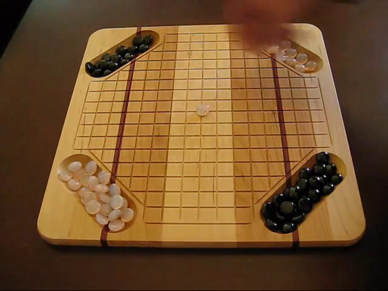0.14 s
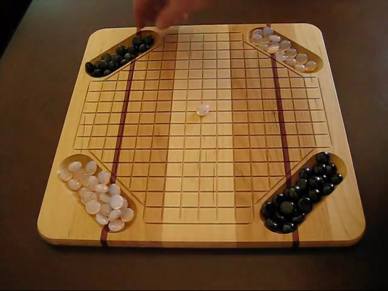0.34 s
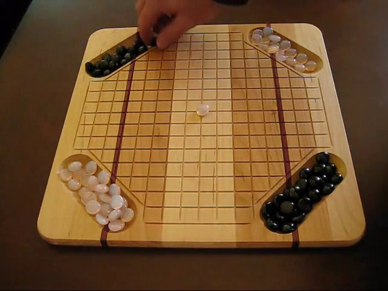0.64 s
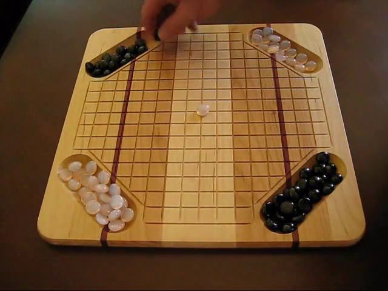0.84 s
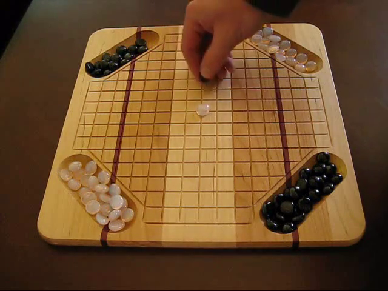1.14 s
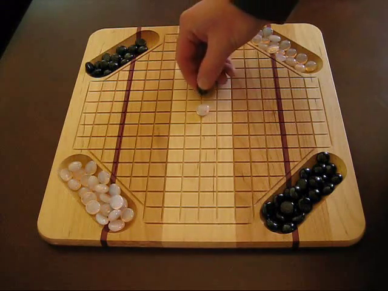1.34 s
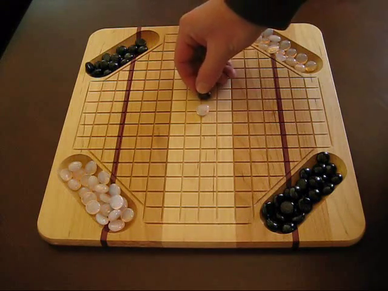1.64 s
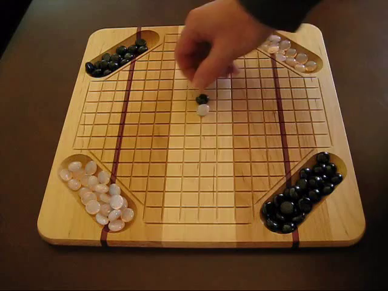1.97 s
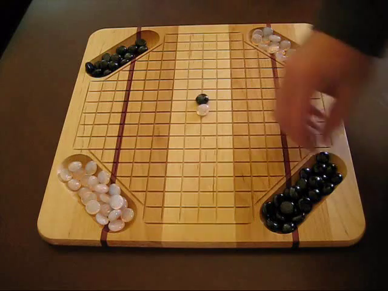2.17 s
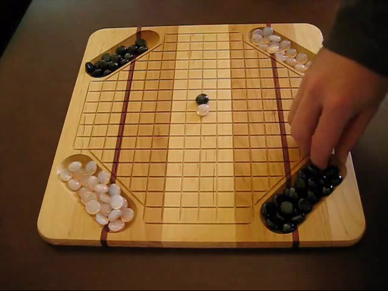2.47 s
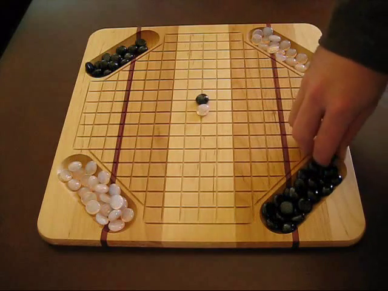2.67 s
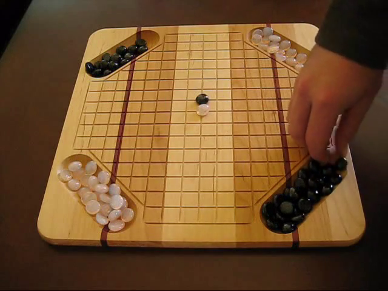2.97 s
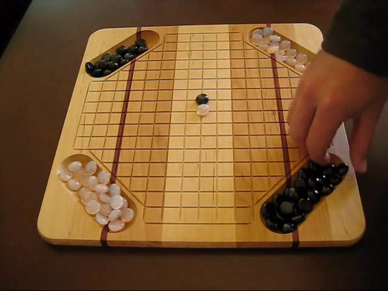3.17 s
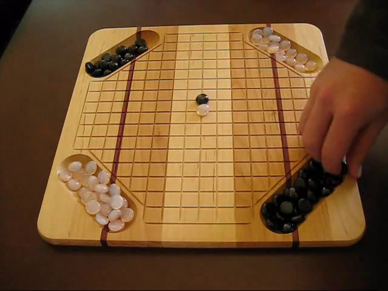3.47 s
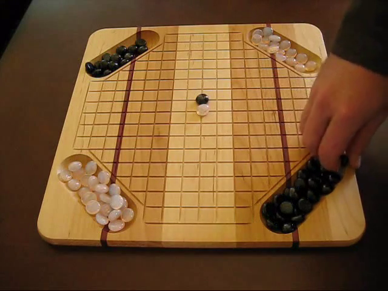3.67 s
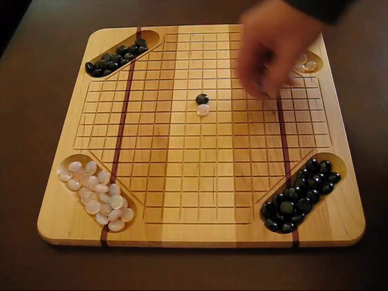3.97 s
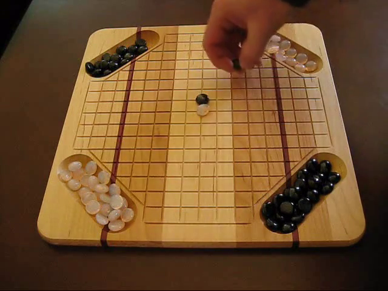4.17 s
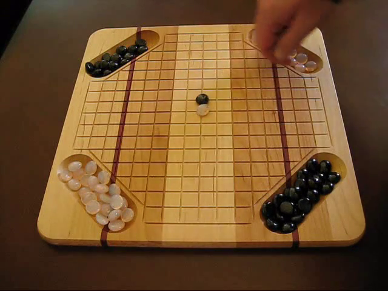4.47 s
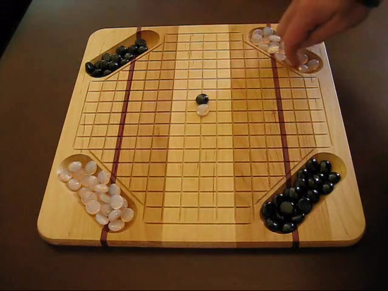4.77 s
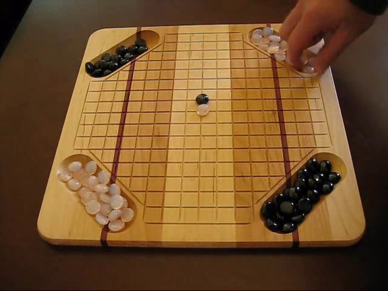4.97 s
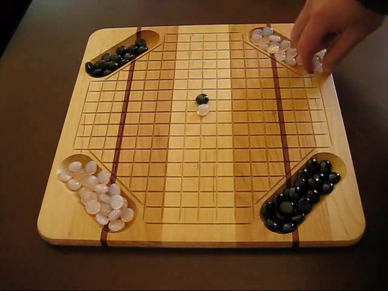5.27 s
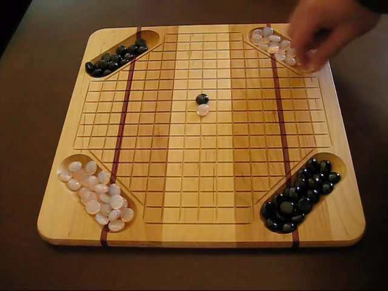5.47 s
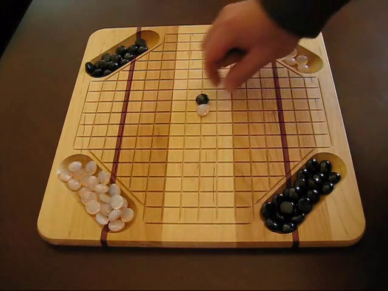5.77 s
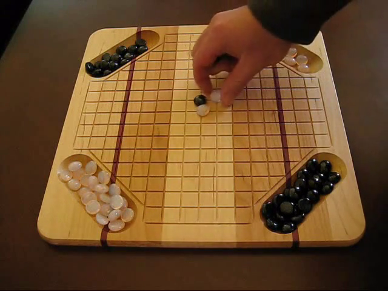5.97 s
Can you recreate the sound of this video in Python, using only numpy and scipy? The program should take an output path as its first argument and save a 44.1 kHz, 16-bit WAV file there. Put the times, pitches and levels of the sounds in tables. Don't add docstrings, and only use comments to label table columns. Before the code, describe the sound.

Glass game pieces are handled on a hollow-cornered wooden board. First come faint touches and a crisp placement with a bounce, then bright glassy clatter in the tray with finger rubs, ending in two hard clicks. Soft picking and a tiny stuttering scrape precede a final flurry of wooden taps. The small microphone picks up short room reflections, hiss and distant motor hum.

```python
import sys
import numpy as np
from scipy import signal
from scipy.fft import rfft, irfft, next_fast_len
from scipy.io import wavfile
from scipy.ndimage import map_coordinates

SR = 44100
rng = np.random.default_rng(int(sys.argv[2]) if len(sys.argv) > 2 else 0)


def ratio_of_db(decibels):
    return 10 ** (np.asarray(decibels, float) / 20)


def wrap_up_sound(samples):
    columns = np.atleast_2d(samples).T
    tamed = np.clip(columns, -1, 1)
    steps = np.round(tamed * 32767).astype(np.int16)
    wavfile.write(sys.argv[1], SR, steps)


N = 269499

TRAY_HZ, TRAY_SPREAD = 3250, .02


def unit(x):
    return x / np.sqrt(np.mean(x ** 2) + 1e-20)


def along(points, hz):
    f, v = np.transpose(points)
    return np.interp(np.log(hz + 1), np.log(f + 1), v)


def curves(points):
    s, *columns = np.transpose(points)
    t = np.arange(N) / SR
    return [np.interp(t, s, c, left=-200, right=-200) for c in columns]


def wobble(rate):
    knots = rng.standard_normal(int(N * rate / SR) + 4)
    return map_coordinates(knots, [np.arange(N) * rate / SR])


def filtered(x, response):
    m = next_fast_len(len(x) + 8192)
    return irfft(rfft(x, m) * response(np.fft.rfftfreq(m, 1 / SR)), m)[:len(x)]


def coloured(spectrum, grain_db=0):
    noise = rng.standard_normal(N) * ratio_of_db(grain_db * wobble(900))
    points = [(11.0, -68.0)] + list(spectrum) + [(22000, -101.5)]
    return unit(filtered(noise, lambda hz: ratio_of_db(along(points, hz))))


def ring(modes, t, spread, scatter_db, chatter=.002):
    hz, t60, db = np.transpose(modes)[:, :, None]
    chance = rng.standard_normal((2, len(modes), 1))
    decay = ratio_of_db(db + scatter_db * chance[0] - 60 * t / t60)
    x = np.sum(decay * np.sin(2 * np.pi * hz * (1 + spread * chance[1]) * t), 0)
    force = rng.standard_normal(len(t)) * (1 - np.exp(-t / 0.0003)) * np.exp(-(t / chatter) ** 2)
    soft = (1 - np.exp(-t / 0.00028)) ** 2
    x = signal.fftconvolve(x * soft, force)[:len(t)]
    return x / np.linalg.norm(x)


def knocks(table, low_modes, upper_modes, crack_colour, crack_t60, level_db, damping=1):
    bright_db = -38
    out, t = np.zeros((2, N + SR)), np.arange(SR // 40) / SR
    hiss_source = coloured(crack_colour)
    for s, db, low_db, upper_db, crack_db, main_hz in table:
        start = round(s * SR)
        main_modes = [(main_hz, .006, 0), (.86 * main_hz, .005, -6), (1.14 * main_hz, .005, -6)]
        wood = 0
        for modes, group_db in [(main_modes, 0), (low_modes, low_db), (upper_modes, upper_db)]:
            damped = np.array(modes) / [1, damping, 1]
            wood = wood + ratio_of_db(group_db) * ring(damped, t, 0.014095, 2, chatter=0.0003)
        crack = hiss_source[min(start, N - len(t)):][:len(t)]
        crack = crack * ratio_of_db(-60 * t / crack_t60) * (1 - np.exp(-t / 0.0005))
        crack = ratio_of_db(db + crack_db + level_db) * crack / np.linalg.norm(crack)
        out[0, start:][:len(t)] += ratio_of_db(db + level_db) * wood
        out[int(db + crack_db > bright_db), start:][:len(t)] += crack
    low_cut = signal.butter(3, 650, "high", fs=SR, output="sos")
    return signal.sosfilt(low_cut, out[:, :N])


def linger(x, modes, level_db):
    def slab(f):
        total = 0
        for hz, t60, db in modes:
            width = np.log(1000) / (np.pi * t60)
            resonance = 1j * f / (hz * hz - f * f + 1j * f * width)
            total = total + ratio_of_db(db) * np.sqrt(1000 * width) * resonance
        return total
    return x + [ratio_of_db(level_db) * filtered(x[0], slab), 0 * x[1]]


def rows(*columns):
    return np.column_stack(np.broadcast_arrays(*columns))


def hum():
    # t/s, f/Hz, level/dB
    lower_tone = [(0.0, 113.1, -76), (0.82, 107.9, -61.5), (1.77, 106.5, -63), (1.89, 112.4, -78.5),
                  (2.11, 103.4, -76), (5.04, 102.5, -62), (6.11, 100.7, -61)]
    upper_tone = [(0.0, 166.2, -59.5), (0.314, 163.8, -59), (0.55, 165.6, -70)]
    total = 0
    for points in (lower_tone, upper_tone):
        hz, db = curves(points)
        level = np.sqrt(2) * ratio_of_db(db + 0.77 * wobble(3.77))
        total = total + level * np.sin(2 * np.pi * np.cumsum(hz) / SR)
    return total


def room_air():
    # t/s, level/dB
    air_level = [(0.0, -49.5), (0.97, -54.5), (5.9, -59.5), (6.11, -44)]
    # f/Hz, level/dB per Hz
    air_colour = [(150, -11), (400, -10.5), (800, -6), (1500, -10), (4000, -17.5)]
    return ratio_of_db(curves(air_level)[0] - 3) * coloured(air_colour)


def microphone_hiss():
    # f/Hz, level/dB per Hz
    hiss_colour = [(12, -57), (20, -18.5), (103, -14), (207, -12.5), (504, -14.5), (563, -14), (612, -16),
                   (15400, -31)]
    return ratio_of_db(-54 + 1.5 + 0.2805 * wobble(3.29)) * coloured(hiss_colour)


def fingers():
    # middle t/s, length/s, wood level/dB, skin and glass level/dB
    rubs = [(0.027, 0.039, -49, -62.5), (0.071, 0.051, -44.5, -47), (0.505, 0.058, -47.5, -61.5),
            (0.65, 0.18, -53, -59.5), (0.709, 0.025, -50, -65.5), (1.2, .08, -58, -61),
            (2.406, 0.072, -43, -51), (2.605, 0.0814, -60, -70), (2.671, 0.045, -49, -66.5),
            (2.775, 0.02823, -45, -50), (2.96, 0.078, -46, -55), (3.051, 0.095, -42.5, -50),
            (3.482, 0.0393, -53, -64), (3.655, 0.02, -34, -30), (3.789, 0.033, -38, -34.5),
            (4.585, 0.053, -63, -52), (4.704, 0.035, -63, -51), (4.892, 0.112, -58, -60),
            (5.11, 0.45, -55.5, -64), (5.37, 0.096, -50, -56.5), (5.374, 0.016, -46, -68.5),
            (2.445, 0.03503, -52, -58.5), (3.15, 0.0475, -59.5, -53), (5.601, 0.057, -44.5, -59)]
    # f/Hz, level/dB per Hz
    wood_colour = [(900, -30.5), (1500, -7), (2100, -1), (2700, -8), (3250, -5), (4300, -10), (6500, -5.5)]
    skin_colour = [(3000, 7), (6000, -24), (10000, 6), (13000, 5.5), (16000, 2)]
    middle, length, wood_db, skin_db = np.transpose(rubs)
    phase = (np.arange(N)[:, None] / SR - middle) / (1.23 * length)
    swell = np.cos(np.pi * np.clip(phase, -.5, .5)) ** 2
    wood, skin = coloured(wood_colour, grain_db=2), coloured(skin_colour, grain_db=3.5)
    return swell @ ratio_of_db(wood_db) * wood + swell @ ratio_of_db(skin_db) * skin


def thumps():
    # t/s, level/dB, f/Hz
    low_knocks = [(.0115, -33, 908.4), (0.501, -39, 220), (.73, -41, 530.3), (1.488, -32, 800),
                  (1.644, -33.5, 544.4), (2.379, -38, 204), (2.82, -43, 413), (3.029, -35, 500),
                  (3.05, -41.5, 200), (3.14, -44, 494.8), (2.4, -46, 600.3), (3.789, -38.5, 405),
                  (5.37, -44.5, 287.4), (6.007, -37, 590), (6.04, -33, 1000)]
    out, t = np.zeros(N + SR), np.arange(SR // 8) / SR
    for s, db, hz in low_knocks:
        t60 = 17 / hz
        modes = [(hz, t60, 0), (1.274 * hz, t60, -4), (0.734 * hz, t60, -5)]
        body = ring(modes, t, 0.028, 2.2, chatter=1.33 / hz)
        out[round(s * SR):][:len(t)] += ratio_of_db(db + 17.5) * body
    return out[:N]


def in_tray(table, hz):
    s, db, low_db, crack_db = np.transpose(table)
    chance = rng.standard_normal((len(s), 2))
    upper_db = -8 + 2.5 * chance[:, 0]
    return rows(s, db, low_db, upper_db, crack_db, hz * (1 + TRAY_SPREAD * chance[:, 1]))


def ticks(table, low_db, upper_db, crack_db):
    s, db = np.transpose(table)
    hz = TRAY_HZ * (1 + 2 * TRAY_SPREAD * rng.standard_normal(len(s)))
    return rows(s, db, low_db, upper_db, crack_db, hz)


def dark_gems():
    # t/s, main level/dB, low ring re main/dB, glass crack
    # re main/dB
    tray_hits = [(.0122, -26, -32, -9.5), (.5127, -30.5, 3, 1.5), (.5264, -32, 3.5, -8),
                 (.5414, -35.5, 8, 18), (2.3671, -36, -1.5, 10), (2.3744, -21, 1.5, 3.5), (2.379, -35, 1, 13),
                 (2.3945, -21, -0.5, -26), (2.4113, -27.5, -4, 7), (2.4202, -33.5, 6.5, -7),
                 (2.7707, -30, -1, -14.5), (2.7741, -18.5, -13, -4.5), (2.781, -27, -9, -2),
                 (2.8192, -19.5, -5.5, 0), (2.9302, -28, -7, 5), (2.9338, -34, 1, 1),
                 (3.001, -26.5, -1.5, -26.5), (3.019, -11, -24.5, 0), (3.024, -21, -0.5, -20),
                (3.0298, -19.5, -8, 0), (3.068, -28, 2, -18), (3.1159, -31, -5, -25.5),
                (3.1346, -15.5, -9, 0), (3.1479, -21.5, -4.5, -5), (3.3089, -29.5, -6, 3.5),
                (3.365, -32.5, -1, 4.5), (3.3826, -35, -6, 2), (3.4702, -31.5, -19, -26),
                (3.492, -29.5, -3, 2.5), (3.4971, -30, -1, -3.5), (3.5226, -23, -8, -0.5),
                (3.526, -26, -8, -12), (3.6534, -21, -13, -12), (3.7901, -22, -2, -10), (3.8274, -34, 1, 2)]
    rim = [
        (2.768, -39, 2.5, -8.5),
        (3.0411, -25.5, 2, -3),
        (3.0975, -21, -8, -22),
        (3.6452, -10.5, -40, -4.5),
        (3.6596, -17.5, -23, -6),
        (3.7795, -13.5, -28, -1.5),
    ]
    # t/s, level/dB
    on_glass = [(.074, -39), (.4911, -43), (2.4078, -35), (2.5847, -46), (2.6016, -46.5), (2.6115, -42),
                (2.6298, -45), (2.7058, -44.5), (2.8258, -39), (2.8999, -48), (2.9051, -41), (3.157, -38),
                (3.7518, -40), (3.8658, -46), (4.871, -34), (4.8849, -43), (4.889, -53)]
    on_wood = [(.1051, -45), (.152, -44), (.5231, -38), (.7013, -44), (.8654, -43), (2.4036, -46),
               (2.6395, -40), (2.6557, -39), (2.6639, -36), (2.6833, -39), (2.7572, -36), (2.9815, -36),
               (3.074, -34), (3.4642, -47), (3.7759, -44), (4.2896, -42), (4.8035, -36.5), (4.825, -44),
               (4.8473, -40), (4.863, -42), (4.9168, -41), (4.9929, -47), (5.004, -38), (5.0744, -42.5),
               (5.1432, -50), (5.152, -46), (5.222, -45.5), (5.3795, -39), (5.6958, -39.5)]
    return np.vstack([in_tray(tray_hits, TRAY_HZ), in_tray(rim, 4270),
                      ticks(on_glass, low_db=0, upper_db=-3, crack_db=3.6),
                      ticks(on_wood, low_db=0, upper_db=-12, crack_db=-17)])


def gem_set_down():
    # t/s, main level/dB, low, upper and crack rings re main/dB
    landings = [
        (1.4878, -12, -3.5, -12.5, -26.5),
        (1.6421, -17.5, -28, -10, -22),
        (1.6431, -6, -10, -2, -16),
        (1.6518, -15, -1, -2, -31),
        (1.9995, -43, -2, -18.5, -17.5),
    ]
    return rows(*np.transpose(landings), 3500)


def drag(count=19):
    start_s, end_s = 5.518, 5.609
    k, chance = np.arange(count), rng.standard_normal((count, 2))
    jitter = .17 * chance[:, 0] * (k > 0)
    s = start_s + (end_s - start_s) * (k + jitter) / (count - 1)
    db = -35 + 10 * np.sqrt(k / count) + 1.6 * chance[:, 1]
    return rows(s, db, -6, -13, -27, TRAY_HZ)


def pale_gem():
    # t/s, main level/dB, low, upper and crack rings re main/dB
    picks = [
        (4.9015, -22.5, -4, -20, -9),
        (5.0234, -35, -2.5, -5, 3.5),
    ]
    return np.vstack([rows(*np.transpose(picks), 2900), drag()])


def gem_rocking():
    # t/s, main level/dB, crack re main/dB
    taps = [(5.9776, -23, -18), (5.9998, -31, -14), (6.0034, -17, -14), (6.0068, -7.5, -12),
            (6.0244, -11, -8), (6.0378, -10, -3), (6.0452, -18, -22), (6.063, -12.5, -18),
            (6.0705, -10.5, -10), (6.079, -14, -22), (6.0906, -13, -16), (6.0972, -13, -8),
            (6.1066, -15, -20)]
    s, db, crack_db = np.transpose(taps)
    return rows(s, db, -7, 0, crack_db, 3500)


def gems(contacts, damping, linger_db):
    # f/Hz, t60/s, level/dB
    tray_low = [(1240, 0.0036, -1), (1560, 0.0037, -15), (1974, 0.0062, 13), (2106, 0.0032, 19)]
    tray_upper = [(4370, 0.0027, 15), (4950, 0.0038, 10.5), (5463, 0.0044, 6), (6790, .004, -24.5)]
    pale_upper = [(4200, 0.00531, -5), (4950, 0.0062, 9), (6090, 0.00344, -24)]
    board_low = [(764.2, 0.013, -31), (1146.8, 0.008585, -28), (1780, 0.008707, 24.5),
                 (2437, 0.00513, -12.5), (2610, 0.0019, 25.5)]
    board_upper = [(4345, 0.0038, 5.5), (5050, 0.0051, 13.5), (5650, 0.0084, 0.5), (7100, 0.002083, -12)]
    # f/Hz, t60/s, level/dB
    tray_linger = [(2128, .05, -14), (3270, .05, -11), (4270, .05, -13)]
    board_linger = [(1133, .06, -11), (1758, .12, -13), (2790, .1, -12), (5300, .06, -16)]
    # f/Hz, level/dB per Hz
    glass_crack = [(7500, -4), (9300, -0.5), (12500, -5), (16500, -20)]
    wood_tap = [(7500, -0.5), (9300, -2.5), (11000, -9.5), (14500, -11), (16000, -31)]
    dark_rows, pale_rows, landing_rows, rocking_rows = contacts
    dark = knocks(dark_rows, tray_low, tray_upper, glass_crack, 0.005007, level_db=14.5, damping=damping)
    pale = knocks(pale_rows, tray_low, pale_upper, glass_crack, 0.00695, level_db=15.5, damping=damping)
    board = knocks(landing_rows, board_low, board_upper, wood_tap, 0.01, level_db=14, damping=damping)
    rocking = knocks(rocking_rows, board_low, board_upper, wood_tap, 0.008, level_db=14.5, damping=damping)
    return linger(dark, tray_linger, linger_db) + pale + linger(board, board_linger, linger_db) + rocking


def room(x, block=SR // 4):
    # f/Hz, t60/s
    room_decay = [(300, 0.56), (2000, 0.29), (5500, 0.28), (14000, 0.16)]
    out = np.zeros(N + SR)
    for start in range(0, N, block):
        hz, t, z = signal.stft(rng.standard_normal(SR // 2), SR, nperseg=128)
        decay = ratio_of_db(-60 * t / along(room_decay, hz)[:, None])
        tail = signal.istft(z * decay, SR, nperseg=128)[1]
        tail[:600] *= 1 + 0.851 * np.linspace(1, 0, 600)
        wet = signal.fftconvolve(x[start:start + block], tail / np.linalg.norm(tail))
        out[start + 90:][:len(wet)] += wet
    return out[:N]


def scene():
    # f/Hz, level/dB
    side_colour = [(500, 4), (1500, 2), (3300, -2), (5500, -5), (9000, -2.5), (15000, -6)]
    contacts = dark_gems(), pale_gem(), gem_set_down(), gem_rocking()
    plain, bright = gems(contacts, damping=0.7, linger_db=-9)
    hand = thumps() + fingers()
    side_gems = np.sum(gems(contacts, damping=2.5, linger_db=0.5), axis=0)
    sideways = filtered(side_gems + hand, lambda hz: ratio_of_db(along(side_colour, hz)))
    background = hum() + room_air() + microphone_hiss()
    faint = plain + hand + ratio_of_db(-5.5) * room(sideways) + background
    audible = lambda hz: (hz < 7700) | ((hz > 8050) & (hz < 15480))
    return (bright + filtered(faint, audible))[None]


def low_pass(x):
    return signal.sosfilt(signal.butter(12, 17010, fs=SR, output="sos"), x)


def record(dry):
    centre, width = 7853, 880

    def notch(f):
        off_centre = centre ** 2 - f * f
        return (off_centre / (off_centre + 1j * f * width)) ** 2
    mix = filtered(dry[0], notch)[None]
    return low_pass(mix)


dry = scene()
out = record(dry)
wrap_up_sound(out)
```